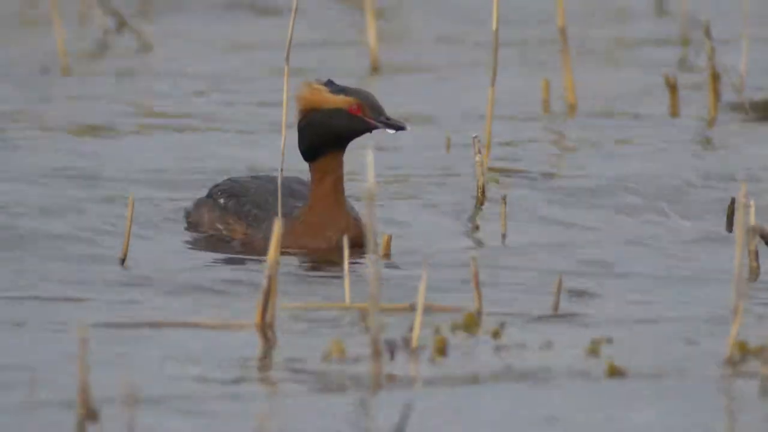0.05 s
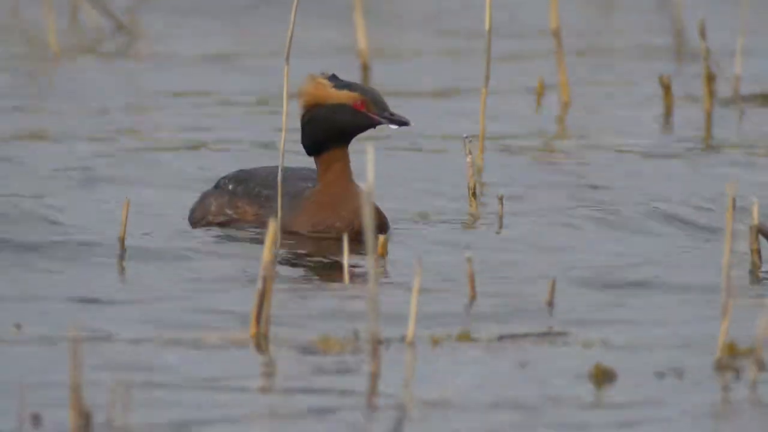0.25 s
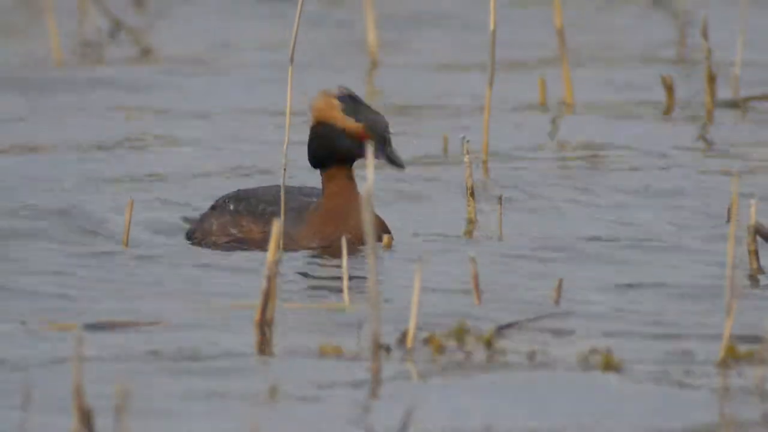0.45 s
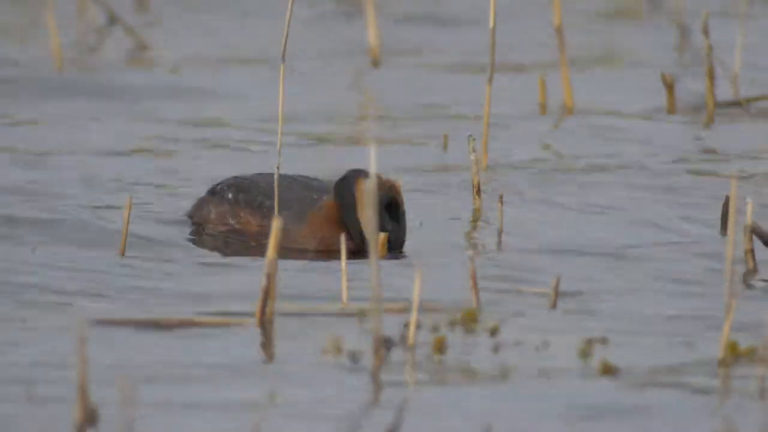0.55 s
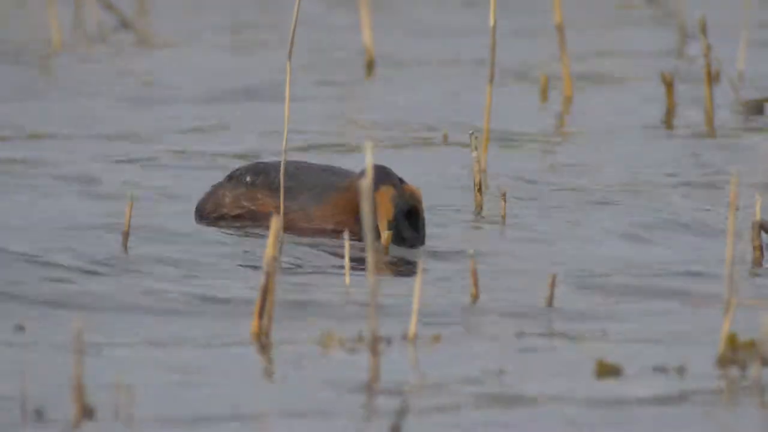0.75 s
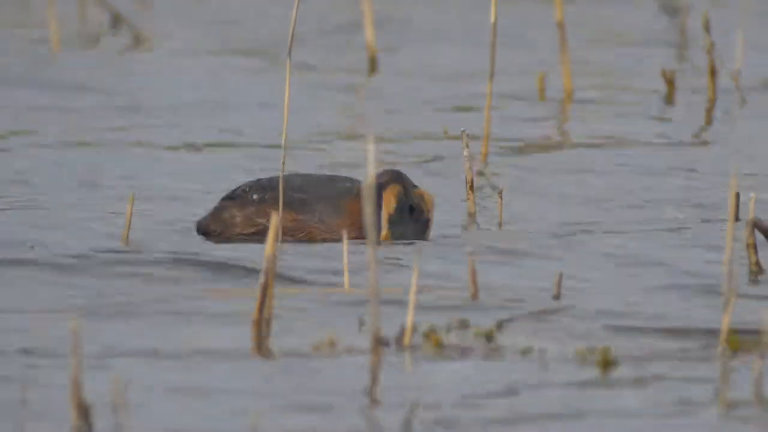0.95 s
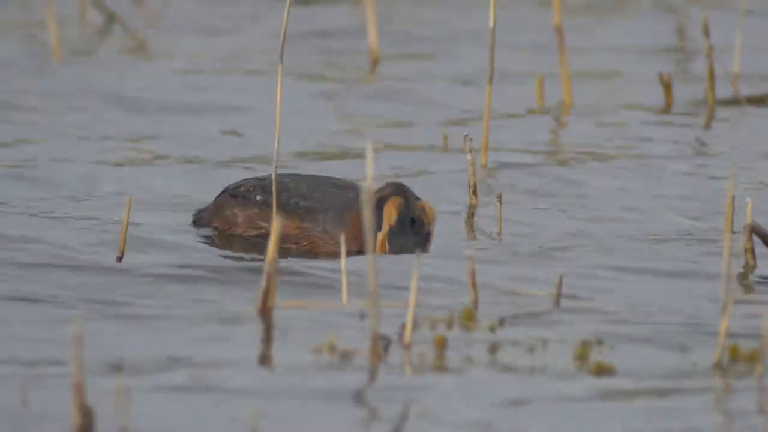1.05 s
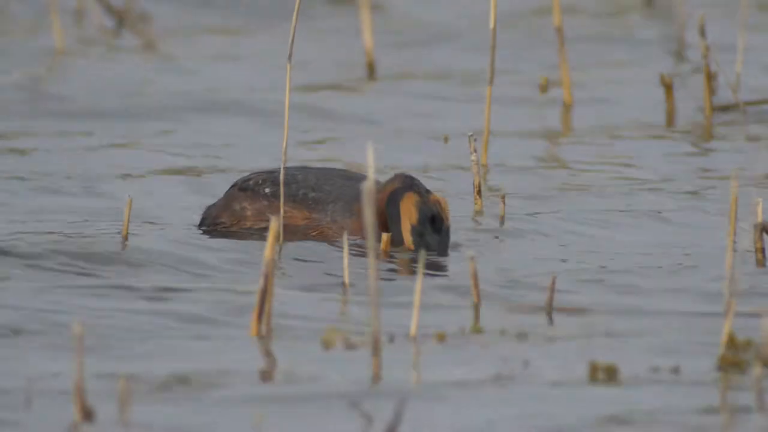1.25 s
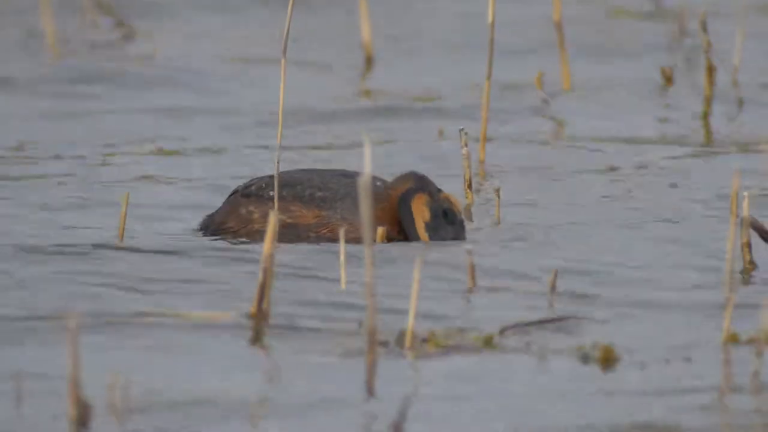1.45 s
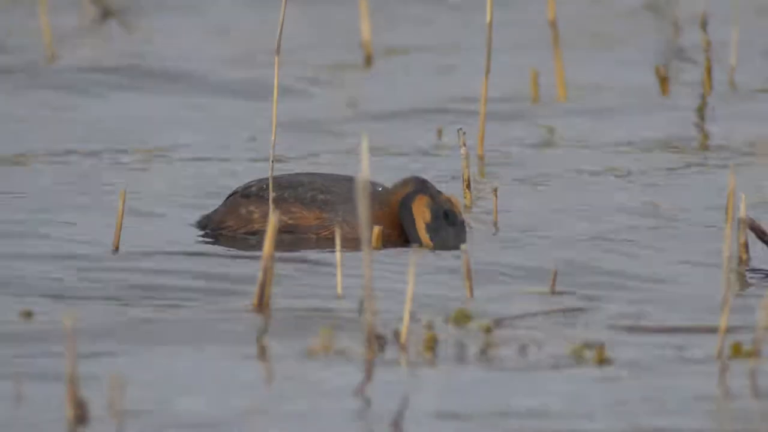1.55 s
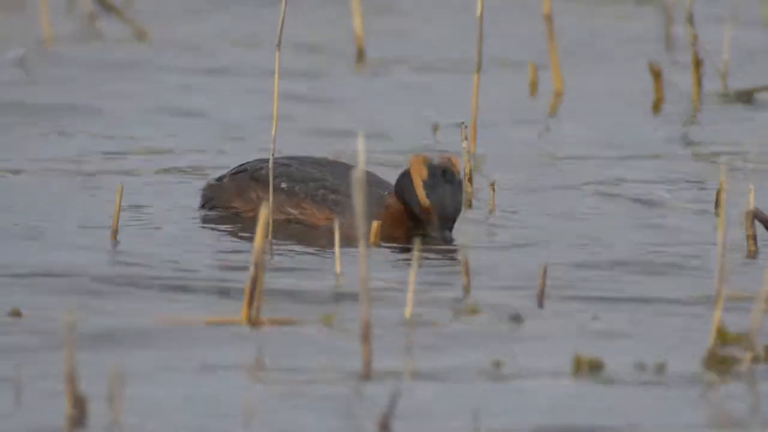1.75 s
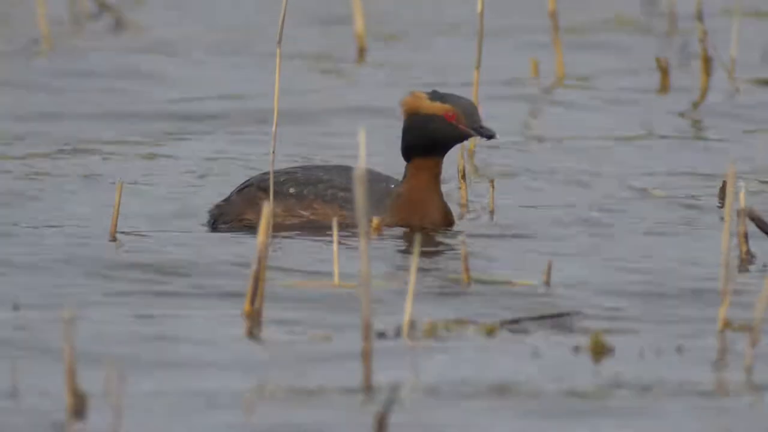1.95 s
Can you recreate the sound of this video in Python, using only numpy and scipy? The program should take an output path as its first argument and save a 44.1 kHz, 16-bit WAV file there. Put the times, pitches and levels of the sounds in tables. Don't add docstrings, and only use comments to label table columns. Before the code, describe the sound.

Wind thumps and rumbles on the microphone, mostly right, strongest around the first half; a distant wader whistles and trills faintly to the right, small birds chirp, and cloth swishes and ticks close by at an open reedy lake.

```python
import sys
import numpy as np
from scipy import signal
from scipy.fft import rfft, irfft, next_fast_len
from scipy.io import wavfile
from scipy.ndimage import uniform_filter1d, map_coordinates

SR = 44100
rng = np.random.default_rng(int(sys.argv[2]) if len(sys.argv) > 2 else 0)


def put_to_file(sound):
    columns = np.atleast_2d(sound).T
    safe = np.clip(columns, -1, 1)
    whole_steps = np.round(safe * 32767)
    wavfile.write(sys.argv[1], SR, whole_steps.astype(np.int16))


def gain_from_db(level_db):
    decades = np.asarray(level_db, float) / 20
    return 10 ** decades


N = 88200
T = np.arange(N) / SR

# f/Hz, level/dB per Hz
CLOTH_COLOUR = [(3000, -10.5), (5100, -16.5), (7600, -11), (9600, 3), (15400, -14)]
FLUTTER_DB = 1.3


def unit(x):
    return x / np.sqrt(np.mean(x ** 2) + 1e-20)


def along(points, hz):
    f, v = np.transpose(points)
    return np.interp(np.log(hz + 1), np.log(f + 1), v)


def curve(rows, column=1):
    rows = np.array(rows)
    return np.interp(T, rows[:, 0], rows[:, column])


def wobble(rate):
    knots = rng.standard_normal(int(N * rate / SR) + 4)
    return map_coordinates(knots, [T * rate])


def hump(s, length):
    u = (T - s) / length
    return np.sin(np.pi * np.clip(u, 0, 1))


def coloured(x, points):
    m = next_fast_len(N + 8192)
    gain = gain_from_db(along(points, np.fft.rfftfreq(m, 1 / SR)))
    return irfft(rfft(x, m) * gain, m)[..., :N]


def noise(patchy_db):
    z = signal.stft(rng.standard_normal((2, N)), nperseg=512)[2]
    field = uniform_filter1d(rng.standard_normal(z.shape[1:]), 4, 0)
    field = uniform_filter1d(field, 10, 1)
    return signal.istft(z * gain_from_db(patchy_db * unit(field)), nperseg=512)[1][:, :N]


def wide(source, spectrum, alike):
    m = next_fast_len(N + 8192)
    hz = np.fft.rfftfreq(m, 1 / SR)
    turn = np.arccos(np.clip(along(alike, hz), -1, 1)) / 2
    shares = gain_from_db(along(spectrum, hz)) * [np.cos(turn), np.sin(turn)]
    mid, side = irfft(rfft(source, m) * shares, m)[:, :N]
    return unit(np.array([mid + side, mid - side]))


def wader():
    # t/s, f/Hz, level/dB
    calls = [
        [(.36, 1815, -79), (.398, 1810, -65), (.425, 2000, -78)],
        [(.494, 2150, -77), (.503, 2100, -57.5), (.514, 1880, -61), (.564, 1850, -54), (.6, 1855, -53.5),
         (.624, 1984, -57), (.636, 1900, -70)],
        [(.69, 2194, -75), (.698, 2040, -51.5), (.709, 1810, -57), (.719, 1905, -52), (.73, 1926, -60),
         (.74, 2036, -51.5), (.775, 2085, -50), (.815, 2084, -48), (.89, 2025, -51)],
        [(1.34, 1580, -66), (1.355, 1630, -61), (1.38, 1772, -51), (1.41, 2040, -50), (1.452, 2110, -47.5),
         (1.464, 1956, -48.5), (1.52, 1953, -46.5), (1.56, 1977, -49.5), (1.578, 1970, -71)],
        [(1.63, 2180, -65), (1.642, 2066, -51.5), (1.659, 1887, -49), (1.675, 2011, -44.5), (1.755, 2038, -44),
         (1.772, 1862, -52), (1.8, 1700, -53.5), (1.82, 1616, -63), (1.844, 1780, -60)],
        [(1.912, 2060, -69), (1.922, 2004, -51), (1.962, 2006, -47.5), (1.974, 1700, -69)],
    ]
    # first break t/s, spacing/s, upsweep in a note/Hz, break width/s, pitch dip at the break/Hz
    trills = [(.709, .0194, 0, .003, 210), (1.395, .021, 200, .0065, 90), (1.665, .018, 560, .008, 40),
              (.829, .02, 0, .002, 130), (.514, .02, 0, .003, 100), (1.366, .02, 0, .005, 0)]
    break_counts = [6, 4, 6, 1, 1, 1]
    gate = np.ones(N)
    sweep_hz = 11.6 * wobble(120)
    for (first, step, up_hz, width, dip_hz), count in zip(trills, break_counts):
        for s in first + step * np.arange(count):
            gate = gate * (1 - np.exp(-((T - s) / width) ** 2))
            sweep_hz = sweep_hz - dip_hz * np.exp(-((T - s) / (1.5 * width)) ** 2)
            u = (T - s) / step
            within_note = (u > 0) * (u < 1)
            sweeps = s < first + step * (count - 1.5) or up_hz > 400
            sweep_hz = sweep_hz + up_hz * (u - .5) * within_note * sweeps
    song = np.zeros(N)
    fade_s = .004
    for call in calls:
        on = np.clip(np.minimum(T - call[0][0], call[-1][0] - T) / fade_s, 0, 1)
        phase = 2 * np.pi * np.cumsum(curve(call) + sweep_hz) / SR
        song += on * gain_from_db(curve(call, column=2)) * np.sin(phase)
    return np.sqrt(2) * song * gate * gain_from_db(wobble(90))


def echoes(x):
    t = np.arange(SR // 4) / SR
    tail = rng.standard_normal((2, len(t))) * gain_from_db(-60 * t / .4) * (t > .004)
    return signal.fftconvolve(x[None], tail / np.linalg.norm(tail[0]), axes=1)[:, :N]


def placed_wader():
    call = wader()
    direct = call * gain_from_db([[-20], [6]])
    return direct + gain_from_db(-15) * echoes(call) * gain_from_db([[-8], [3]])


def glide(s, length, from_hz, to_hz, db):
    t = T - s
    mean_hz = from_hz + (to_hz - from_hz) * t / (2 * length)
    return hump(s, length) * gain_from_db(db + FLUTTER_DB * wobble(61.06)) * np.sin(2 * np.pi * t * mean_hz)


def arching_whistle():
    # t/s, f/Hz, level/dB
    arch = [(.22, 2400, -87), (.3, 2620, -85), (.36, 2990, -79), (.46, 3130, -84), (.58, 3090, -80),
            (.63, 2920, -77), (.68, 2710, -73), (.75, 2620, -78), (.9, 2420, -90)]
    on = hump(arch[0][0], arch[-1][0] - arch[0][0]) > 1e-3
    level = on * gain_from_db(curve(arch, column=2) + FLUTTER_DB * wobble(40.3))
    return level * np.sin(2 * np.pi * np.cumsum(curve(arch)) / SR)


def small_birds():
    # start t/s, length/s, start f/Hz, end f/Hz, level/dB
    single_notes = [
        (.215, .06, 2900, 3800, -77),
        (.635, .03, 3200, 3200, -70),
        (1.035, .05, 2000, 2150, -67),
        (1.04, .15, 3060, 3140, -69),
        (.98, .27, 2800, 2760, -70),
        (1.22, .17, 3075, 3020, -68),
        (1.96, .04, 2750, 2480, -69),
    ]
    # first t/s, spacing/s, length/s, start f/Hz, end f/Hz, first level/dB
    chip_runs = [
        (.168, .0915, .04, 4200, 3150, -79),
        (.782, .1, .028, 2800, 4100, -74),
        (.445, .034, .022, 2600, 2620, -76),
    ]
    chip_counts = [6, 3, 3]
    right = sum(glide(*note) for note in single_notes)
    left = arching_whistle()
    for (first, step, length, from_hz, to_hz, db), count in zip(chip_runs, chip_counts):
        for k in range(count):
            left = left + glide(first + k * step, length, from_hz, to_hz, db + 1.2 * k)
    return right * gain_from_db([[-4.5], [4]]) + left * gain_from_db([[6], [-12]])


def wind_rumble():
    # t/s, level/dB
    gusts = [(0, -44), (.47, -39.5), (.55, -29.5), (.74, -32), (.8, -38.5), (.92, -34), (1.07, -43),
             (1.1, -49.5), (1.22, -45.5), (1.45, -37.5), (1.74, -44), (1.78, -46.5), (1.92, -43.5),
             (2, -46.5)]
    # f/Hz, level/dB per Hz
    rumble_colour = [(25, -55), (64, -5.5), (130, 0), (270, -8.5), (420, -22), (800, -69.5)]
    lumps_db = 2 * np.array([wobble(39.9), wobble(40.08)])
    own = rng.standard_normal((2, N)) * gain_from_db(lumps_db)
    return gain_from_db(curve(gusts) + 4) * [unit(coloured(v, rumble_colour)) for v in own]


def wind_thumps():
    # t/s, peak level/dB, f/Hz
    thumps = [(0.044, -26.5, 108), (0.057, -31.5, 127), (0.088, -30.5, 123), (0.116, -37, 126),
              (0.134, -30, 176), (0.15, -29.5, 139), (0.202, -33, 137), (0.221, -31, 166),
              (0.241, -25.5, 147), (0.268, -32, 152), (0.301, -28, 190), (0.347, -34.5, 176),
              (0.357, -36, 180), (0.399, -26.5, 153), (0.433, -28.5, 126), (0.479, -22, 143),
              (0.498, -22, 168), (0.51, -13.5, 154), (0.528, -9.5, 145), (0.54, -11, 196),
              (0.56, -15.5, 196), (0.576, -10.5, 232), (0.608, -17.5, 160), (0.624, -11, 280),
              (0.658, -10.5, 163), (0.676, -29, 185), (0.707, -15.5, 224), (0.732, -21.5, 253),
              (0.767, -10, 203.4), (0.805, -36, 141), (0.82, -28, 137), (0.846, -16, 158),
              (0.879, -15.5, 205), (0.898, -22, 186), (0.908, -15.5, 126.7), (0.935, -22.5, 163),
              (0.957, -21, 148), (1.004, -16.5, 274), (1.033, -29.5, 240), (1.05, -25, 135),
              (1.064, -26, 167), (1.175, -22.5, 168), (1.328, -17.5, 132), (1.341, -15.5, 159),
              (1.416, -26, 159), (1.435, -30.5, 143), (1.451, -21, 147), (1.478, -25.5, 128),
              (1.5, -32, 121), (1.523, -27, 139), (1.551, -26.5, 131), (1.566, -31.5, 195),
              (1.619, -30, 141), (1.639, -31.5, 170), (1.688, -27, 151), (1.712, -33, 132),
              (1.73, -24.5, 124), (1.914, -31.5, 108)]
    # t/s, peak level/dB, f/Hz
    more_thumps = [(.755, -19.5, 100), (1.012, -24, 103), (.99, -23.5, 200), (.915, -21, 262), (.65, -20, 305),
                   (0.54, -20, 352)]
    # f/Hz, level/dB per Hz
    grit_colour = [(40, -43), (250, 5.5), (500, -8), (900, -29), (1500, -90)]
    # f/Hz, gain/dB
    grit_rolloff = [(750, 0), (1100, -50)]
    grit = unit(coloured(rng.standard_normal(N), grit_colour))
    grit = coloured(np.tanh(grit), grit_rolloff)
    events = [*thumps, *more_thumps]
    out = np.zeros(N)
    for (s, db, hz), (turn, scale) in zip(events, rng.random((len(events), 2))):
        t = T - s
        u = t * hz / (0.58 * (1 + scale / 2))
        falling = 1 - .25 * np.tanh(u)
        push = np.cos(2 * np.pi * (hz * t * falling + turn))
        grit_db = -8.5 + 18.6 * np.log(hz / 180)
        rasp = gain_from_db(grit_db) * grit * np.exp(-(1.99 * u) ** 2 / 2)
        out = out + gain_from_db(db) * np.exp(-u ** 2 / 2) * (push + rasp)
    return out


def wind():
    # f/Hz, gain/dB
    leak = [(40, -11.5), (150, -13), (400, -18.5)]
    left, right = wind_rumble()
    right = right + wind_thumps()
    return np.array([gain_from_db(-17) * left + coloured(right, leak), right])


def sleeve_swish():
    # t/s, level/dB
    stroke = [(.97, -76), (.98, -51.5), (1.07, -48), (1.11, -41.5), (1.17, -48.5), (1.3, -65)]
    # f/Hz, level/dB per Hz
    swish_colour = [(150, -31), (350, 6), (950, -4.5), (2000, -16), (4300, -23.5), (5000, -36),
                    (8900, -23.5), (15400, -35.5)]
    on = (T > stroke[0][0]) & (T < stroke[-1][0])
    level = on * gain_from_db(curve(stroke) + wobble(49.2))
    return level * wide(noise(patchy_db=1), swish_colour, [(400, 0.38)])


def crinkles():
    # start t/s, length/s, level/dB
    folds = [
        (0, 0.0071, -63),
        (0.03, 0.41, -75.5),
        (1.356, 0.23, -74),
        (1.73, 0.18, -59.5),
        (1.774, 0.032, -59.5),
        (1.823, 0.028, -63),
        (1.888, 0.045, -65),
    ]
    chance, size = rng.random((2, N)), rng.exponential(size=N)
    struck = chance[0] < 2200 / SR
    grains = unit(struck * gain_from_db(5 * np.minimum(size, 3)) * np.sign(chance[1] - .5))
    rub = [grains, np.roll(grains, SR // 9)] + 1.4 * rng.standard_normal((2, N))
    swell = sum(gain_from_db(db) * hump(s, d) for s, d, db in folds) * gain_from_db(2.6 * wobble(70.2))
    return swell * wide(rub, CLOTH_COLOUR, [(9000, 0.6)])


def cloth_ticks():
    # t/s, peak level/dB
    ticks = [(.008, -49), (.072, -55), (.102, -55), (.122, -55), (.225, -59), (.29, -59), (.35, -63),
             (.372, -57.5), (0.656, -48.5), (0.806, -53.5), (0.9766, -61), (1.4049, -52), (1.788, -41),
             (1.7945, -48), (1.801, -50), (1.806, -51), (1.831, -43), (1.8375, -47), (1.8985, -53),
             (1.906, -51), (1.912, -49), (1.9188, -47), (1.967, -47.5)]
    tick_s = 0.00089
    snap = sum(gain_from_db(db - 6) * np.exp(-((T - s - tick_s) / tick_s) ** 2) for s, db in ticks)
    return snap * wide(rng.standard_normal((2, N)), CLOTH_COLOUR, [(9000, 0.71)])


def backdrop():
    # t/s, level/dB
    road_level = [(0, -51.5), (1.25, -46), (2, -46)]
    # f/Hz, level/dB per Hz
    road_colour = [(250, -7.5), (650, -9), (950, 1.5), (1250, -7.5), (1450, -15), (1620, -26), (4000, -50)]
    # t/s, level/dB
    upper_level = [(.9, -78.5), (1.3, -57.5), (2, -57.5)]
    # f/Hz, level/dB per Hz
    upper_colour = [(900, -38), (1700, 2.5), (4300, -20), (5000, -31.5)]
    # f/Hz, level/dB per Hz
    hiss_colour = [(1200, -28), (2000, 0), (3500, 0.5), (5200, -5), (9800, -3), (12500, -7), (15400, -11)]
    # f/Hz, correlation/1
    likeness = [(500, 0.93), (1200, 0.46), (3000, -0.33), (7000, 0.22), (15000, 0.56)]
    road = gain_from_db(curve(road_level) + 1.22 * wobble(7.68)) * wide(noise(patchy_db=1.23), road_colour, likeness)
    road = road * gain_from_db([[-.8], [.8]])
    upper = gain_from_db(curve(upper_level)) * wide(noise(patchy_db=3.0), upper_colour, likeness)
    hiss = gain_from_db(-66.5 + 0.27 * wobble(7.02)) * wide(noise(patchy_db=0.7), hiss_colour, likeness)
    return road + upper + hiss


def scene():
    birds = placed_wader() + small_birds()
    cloth = sleeve_swish() + crinkles() + cloth_ticks()
    return birds + wind() + cloth + backdrop()


def top_cut(x):
    return signal.sosfilt(signal.butter(12, 15700, fs=SR, output="sos"), x)


def record(dry):
    # f/Hz, gain/dB
    mic_band = [(20, -16), (50, 0), (7770, 0), (7850, -12), (7930, 0), (15300, 0), (15550, -36)]
    return top_cut(coloured(dry, mic_band))


dry = scene()
out = record(dry)
put_to_file(out)
```